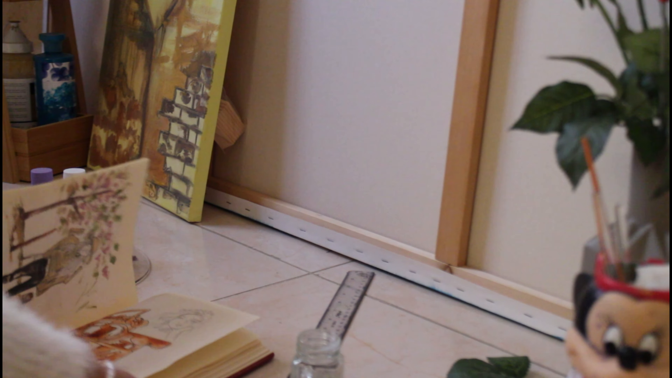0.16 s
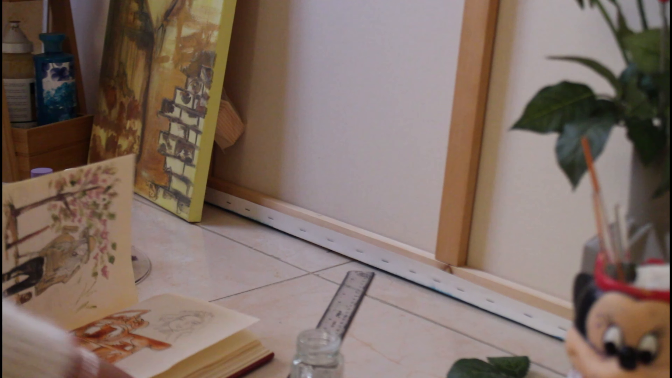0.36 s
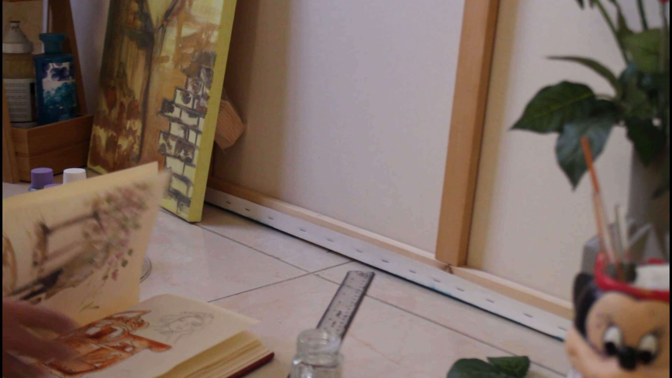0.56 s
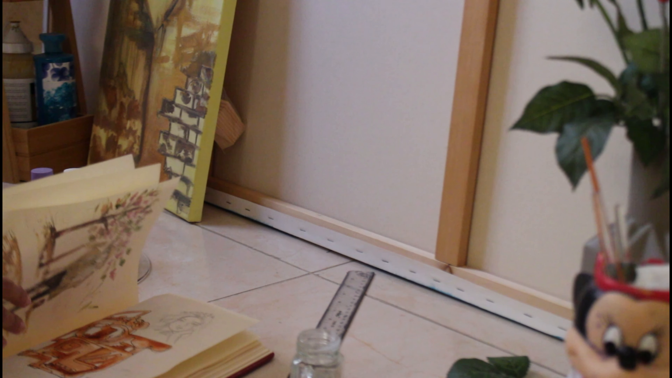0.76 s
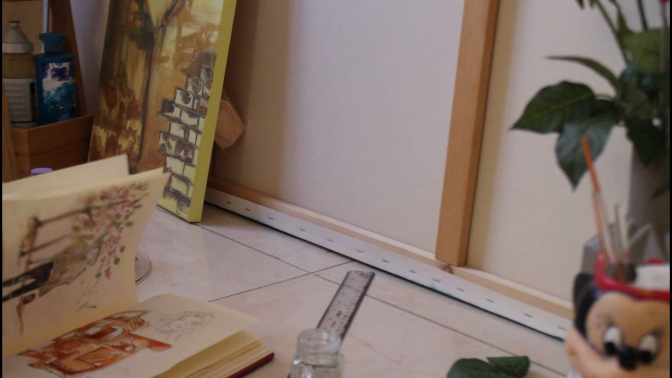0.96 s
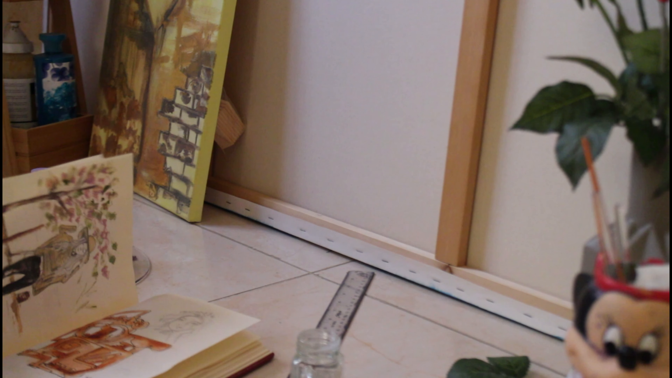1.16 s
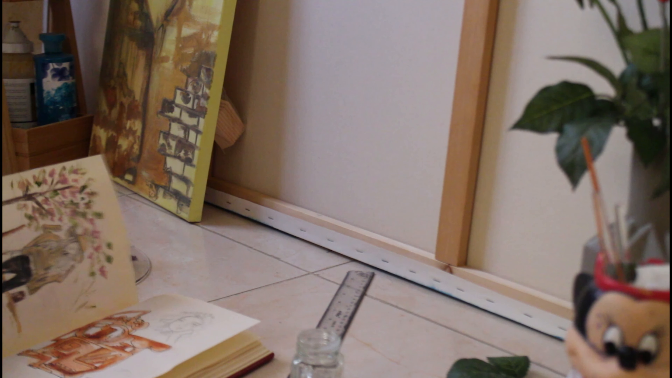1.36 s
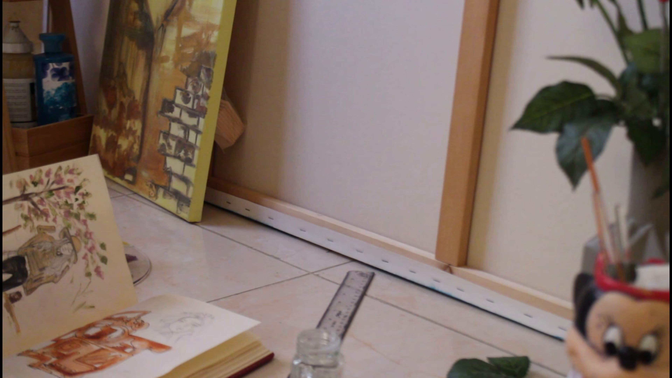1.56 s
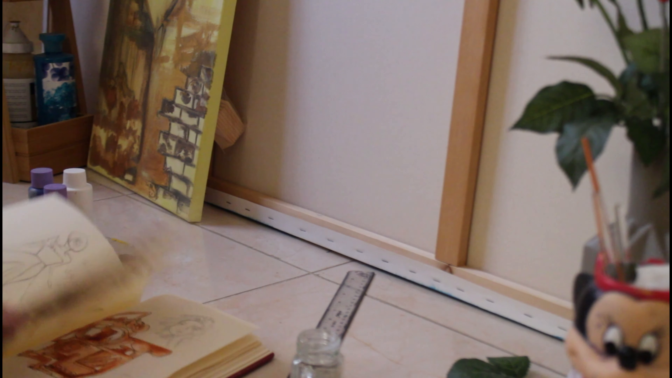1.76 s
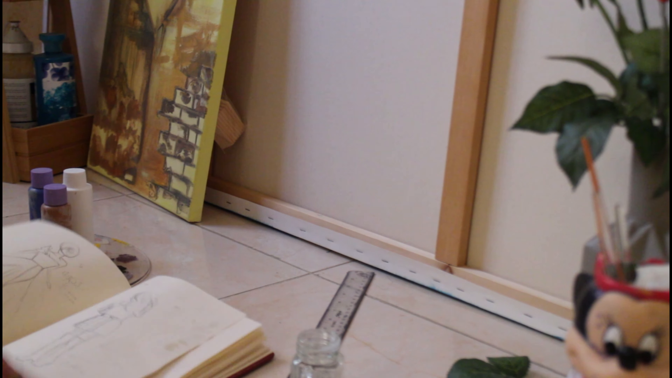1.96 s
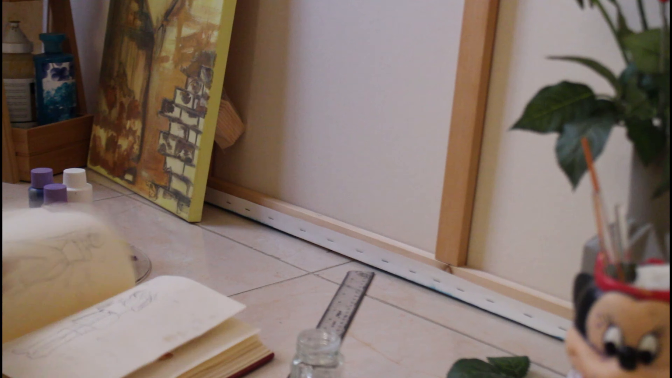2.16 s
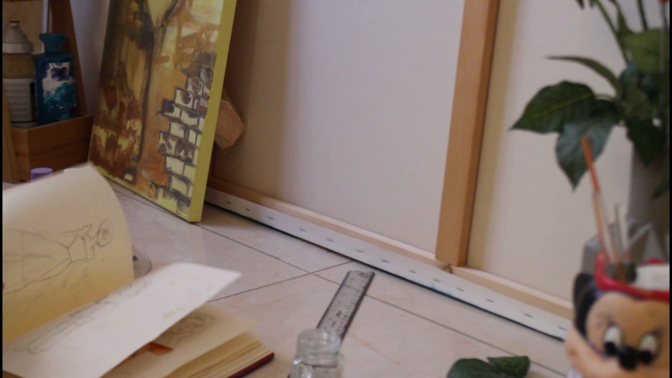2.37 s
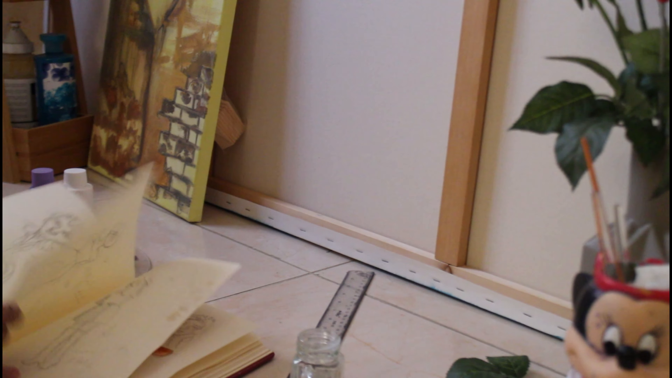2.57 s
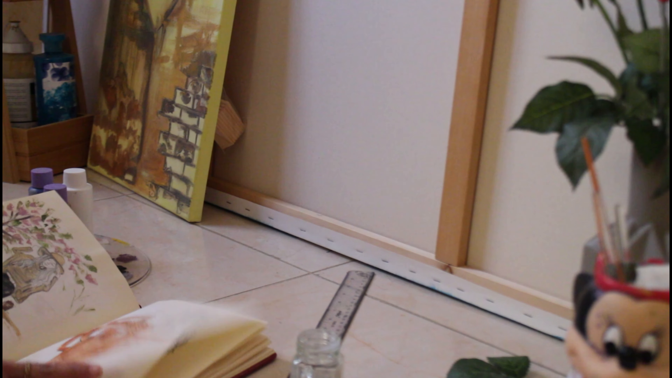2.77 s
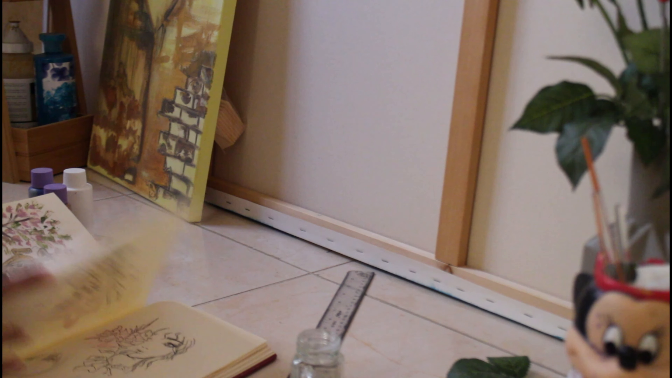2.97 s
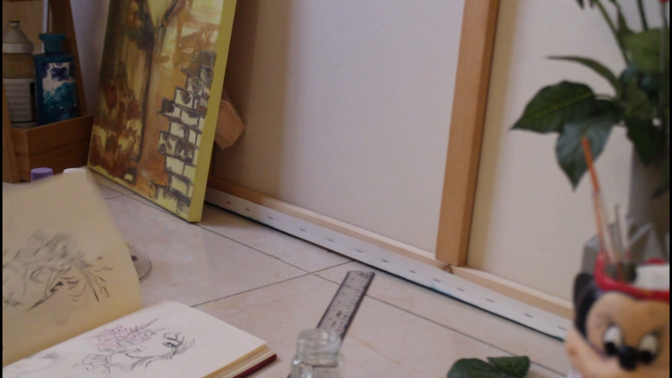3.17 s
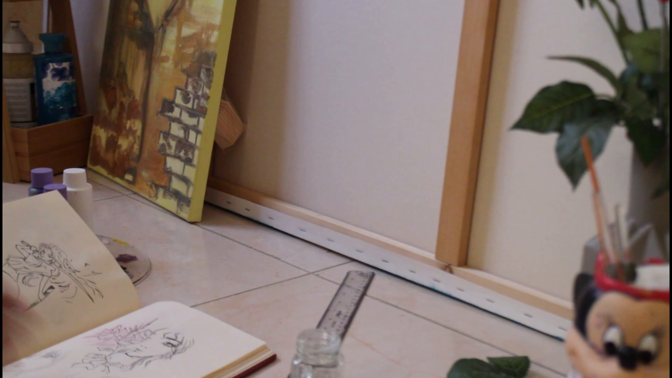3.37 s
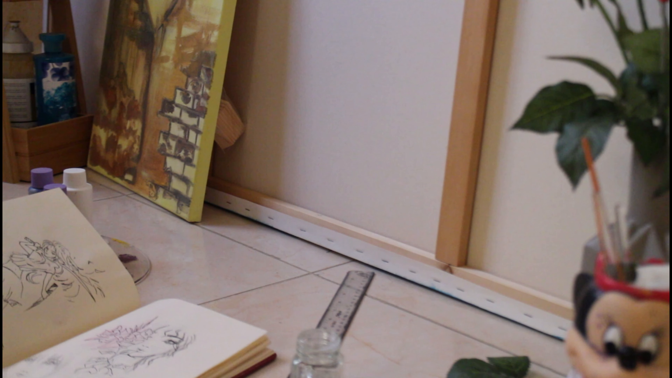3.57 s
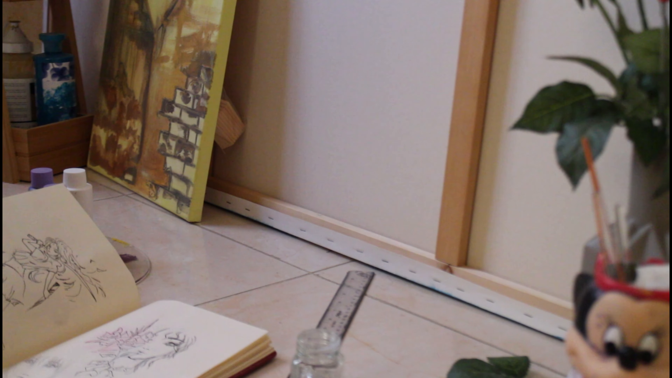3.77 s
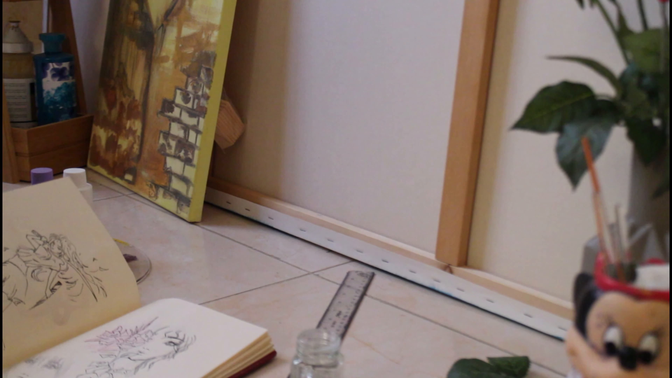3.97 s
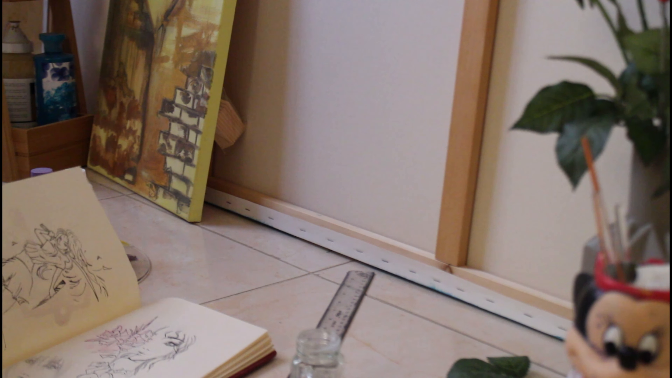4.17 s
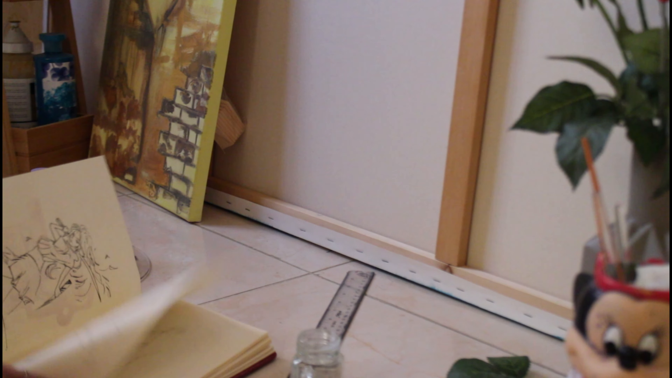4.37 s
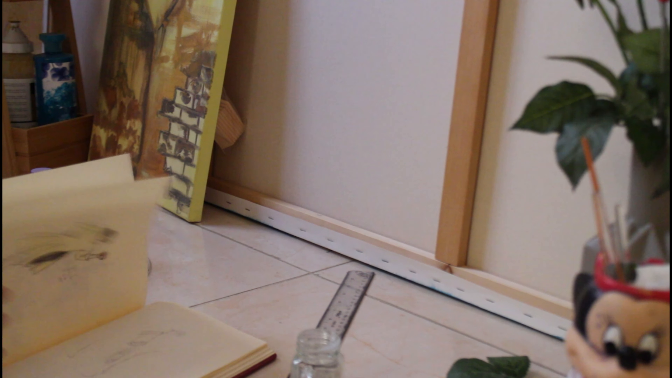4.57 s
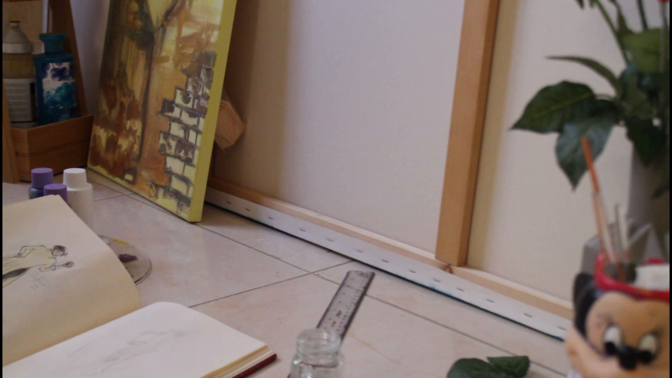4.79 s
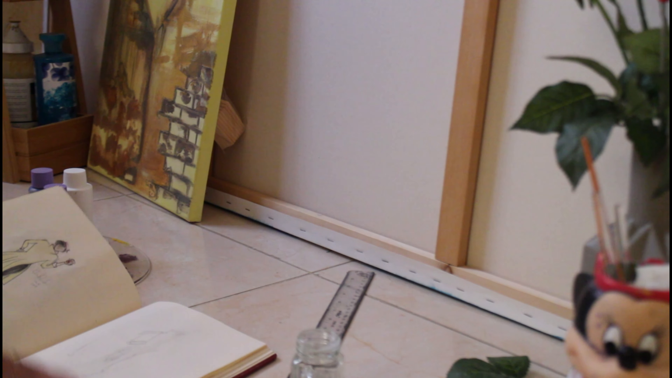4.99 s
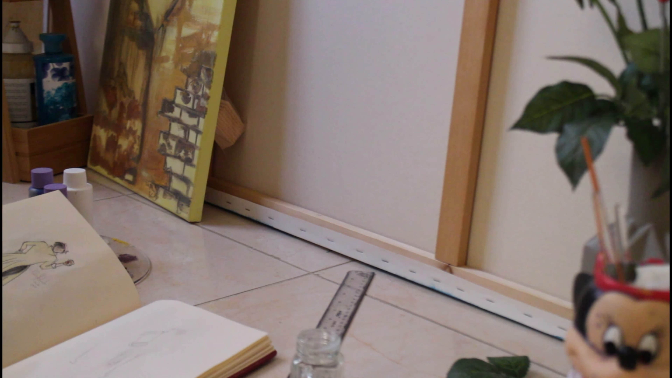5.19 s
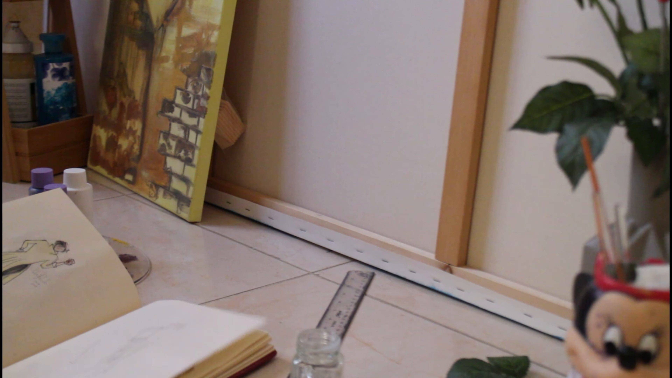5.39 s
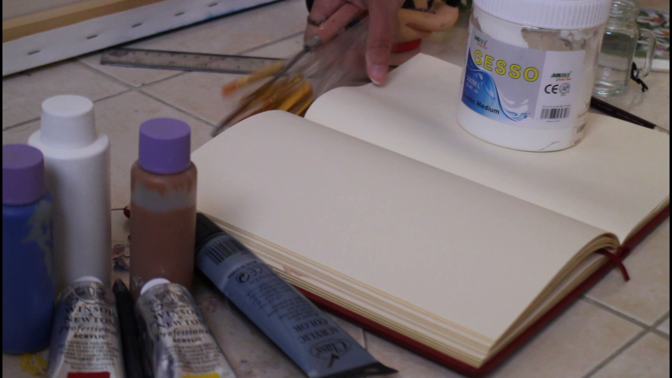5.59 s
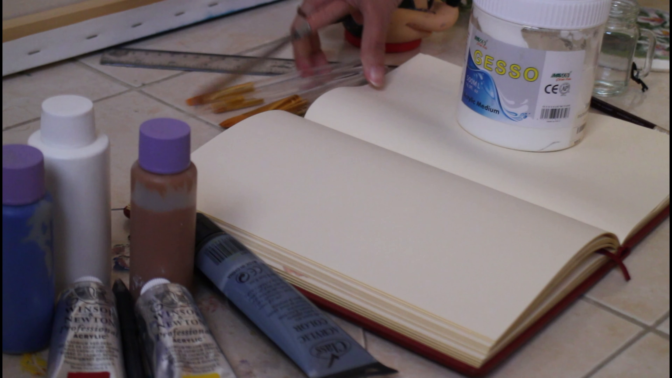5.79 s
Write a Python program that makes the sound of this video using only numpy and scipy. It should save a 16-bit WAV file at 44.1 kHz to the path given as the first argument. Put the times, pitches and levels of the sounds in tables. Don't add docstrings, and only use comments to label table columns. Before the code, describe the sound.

Indoors on a tiled floor, thick sketchbook pages slide and flick, quietly at first, then turn with sharp slaps around two and a half and four and a half seconds. After a lull, a bundle of wooden brushes rattles down at the end. A small camera microphone about a metre away adds hiss and faint motor ticks.

```python
import sys
import numpy as np
from scipy import signal
from scipy.fft import rfft, irfft
from scipy.io import wavfile
from scipy.ndimage import uniform_filter1d

SR = 44100
rng = np.random.default_rng(int(sys.argv[2]) if len(sys.argv) > 2 else 0)


def int16_out(signal):
    q = np.round(np.clip(np.atleast_2d(signal).T, -1, 1) * 32767)
    wavfile.write(sys.argv[1], SR, q.astype(np.int16))


def rack_gain(trim_db):
    fader = np.asarray(trim_db, float)
    return 10 ** (fader / 20)


N = 257544

SCENE_CHANGES = (2.65, 5.484)


def read(table, hz):
    f, v = np.transpose(table)[:2]
    return np.interp(np.log(hz + 1), np.log(f), v)


def shape(x, gain):
    n = x.shape[-1]
    return irfft(rfft(x) * gain(np.arange(n // 2 + 1) * SR / n), n)


def level(x, db):
    return x * rack_gain(db) / np.sqrt(np.mean(x ** 2))


def bell(f, hz, below, above):
    octaves = np.log2((f + 1) / hz)
    return rack_gain(-6 * (octaves / np.where(octaves < 0, below, above)) ** 2)


def walk(rate):
    k = int(SR / rate)
    held = np.repeat(rng.standard_normal(N // k + 1), k)
    return 1.48 * uniform_filter1d(held, k)[:N]


def slips(per_s, spread_db):
    happens = rng.random(N) < per_s / SR
    return happens * rng.standard_normal(N) * rack_gain(spread_db * np.minimum(rng.exponential(size=N), 3))


def ring(x, hz, t60):
    r, w = np.exp(-np.log(1000) / (t60 * SR)), 2 * np.pi * hz / SR
    return signal.lfilter([0, r * np.sin(w)], [1, -2 * r * np.cos(w), r * r], x)


def swells(s, peak_db, rise_s, fall_s, curve):
    block = 32
    t = np.arange(0, N, block) / SR
    s, peak_db, rise_s, fall_s = (np.reshape(v, (-1, 1)) for v in (s, peak_db, rise_s, fall_s))
    rising = (s - t) / np.maximum(rise_s, .01)
    falling = (t - s) / np.maximum(fall_s, .01)
    db = peak_db - 20 * np.maximum(rising, falling) ** curve
    same_scene = np.searchsorted(SCENE_CHANGES, t) == np.searchsorted(SCENE_CHANGES, s)
    power = rack_gain(2 * db) * same_scene + 1e-14
    return np.repeat(power, block, axis=1)[:, :N]


def snaps(s, peak_db, hz, thump_db, wall_db, length, below, above, thump_hz, rise):
    size, lead = 4096, 512
    out = np.zeros((2, N + size))
    t = np.arange(size) / SR - lead / SR
    fade = np.clip(1 + t / (rise * length), 0, 1) * np.exp(-np.log(1000) * np.maximum(t, 0) / length)
    events = np.broadcast(s, peak_db, hz, thump_db, wall_db)
    noises = rng.standard_normal((len(s), size))
    for (s, peak_db, hz, thump_db, wall_db), noise in zip(events, noises):
        puff = noise * fade
        both = np.array([puff, (t == 0) * np.linalg.norm(puff)])
        low_hz = thump_hz * rack_gain(np.clip(noise[0], -1, 2))
        crack = shape(both, lambda f: bell(f, hz, below, above))
        thump = shape(both, lambda f: bell(f, low_hz, 0.9, 1.0))
        snap = crack / np.abs(crack[0]).max() + rack_gain(thump_db) * thump / np.abs(thump[0]).max()
        i = int((s + rise * length / 2) * SR) - lead
        out[:, i:i + size] += rack_gain(peak_db - 0.5 + np.array([[0], [wall_db]])) * snap
    return out[:, :N]


def pages():
    # time in seconds, peak in dB, centre in Hz, relative thump in dB.
    flicks = [(0.16, -55.5, 1380, -1), (0.324, -64.5, 1100, -11), (0.563, -46.5, 1200, -11),
              (.594, -53.5, 1000, -20), (1.347, -55, 1560, -18), (3.204, -40.5, 1200, -22),
              (3.255, -45, 1500, -24), (3.278, -48, 1700, -20), (0.6971, -41, 1730, -25),
              (1.256, -59, 420, -17.5), (1.7696, -44.5, 1060, -22), (1.833, -45.5, 1460, -12),
              (1.8804, -33.5, 2200, -26), (2.223, -24, 1750, -21), (2.4736, -24.5, 2750, -37),
              (2.82, -46, 1500, -21), (2.995, -47, 1190, -9), (3.1175, -40.5, 1120, -1.5),
              (3.1728, -41, 1200, -19), (4.3618, -33.5, 2380, -20), (4.403, -46, 2040, -23),
              (5.4266, -49.5, 2700, -5.5)]
    # time in seconds, peak in dB, centre in Hz,
    # relative thump in dB.
    buckles = [(1.002, -48, 2050, -18), (1.0994, -48, 2470, -20), (1.1343, -41, 2240, -15.5),
               (1.4357, -50, 2070, -15), (1.67, -50.5, 1780, -10), (1.772, -51.5, 850, -23),
               (2.164, -43, 1370, -9), (2.8688, -40.5, 1310, -32), (2.8891, -37, 1400, -34),
               (3.0322, -41, 1390, -7.5), (3.1003, -39.5, 1130, -27.5), (3.142, -42.5, 1500, -30),
               (3.2224, -39.5, 1340, -34), (3.265, -55, 1410, -30), (4.4525, -40, 1090, -26)]
    # time in seconds, peak in dB, centre in Hz, relative thump in dB,
    # share to the walls in dB.
    slaps = [
        (1.396, -33.5, 2060, -25, -8),
        (2.219, -29, 3100, -26, -2),
        (2.4832, -25.5, 2100, -27.5, 0.5),
        (3.231, -46, 1500, -7, -9),
        (4.5745, -21, 2780, -23, -3.5),
    ]
    # time in seconds, peak in dB, centre in Hz.
    crackles = [(1.3953, -38.5, 3820), (1.8815, -61, 4760), (1.894, -44, 5200), (2.471, -31.5, 3900),
                (3.0234, -39.5, 4100), (3.034, -38, 4500), (3.0892, -36, 4500), (2.9906, -34.5, 1400),
                (0.6967, -42, 2970), (3.1, -35, 3180), (3.144, -39.5, 2300), (3.225, -44, 2800),
                (0.62, -53, 2500), (0.756, -51, 1610), (1.434, -41, 2120), (1.469, -47, 2100),
                (1.63, -51, 1500), (4.394, -45, 2800), (4.452, -50, 3000), (4.497, -51, 1500),
                (3.194, -40.5, 7100), (4.486, -47, 4100), (4.5625, -25.5, 3700)]
    out = snaps(*np.transpose(flicks), wall_db=-3.5,
                length=.016, below=0.95, above=0.96, thump_hz=515, rise=0.2397)
    out += snaps(*np.transpose(buckles), wall_db=-2.5,
                 length=.035, below=0.82, above=1.0, thump_hz=520, rise=.25)
    out += snaps(*np.transpose(slaps),
                 length=.054, below=1.43, above=0.6, thump_hz=370, rise=.11)
    out += snaps(*np.transpose(crackles), thump_db=-13.0, wall_db=-4.5,
                 length=.01, below=0.55, above=0.75, thump_hz=1000, rise=0.3)
    return out


def slide():
    # time of fastest motion in seconds, scrape in dB,
    # seconds to gain 20 dB, seconds to lose 20 dB, brightness in dB.
    drags = [(0, -74, .1, .5, 6), (.54, -66, 0.15, -0.1, -1), (0.629, -56, 0.1449, 0.11, -2.5),
             (.86, -60.5, 0.23, 0.1, -4), (1.015, -73, 0.12, 0.4, -2), (1.11, -65, 0.3, 0.13, -7.5),
             (1.139, -57.5, 0.03, 0.08, 9), (1.2, -70.5, 0.6, 0.5, -5), (1.397, -60, 0, 0.06, 14.5),
             (1.53, -60, 0.12, 0.1, -2.5), (1.65, -73, 1, 0.2, -10), (1.9, -69.5, 0.35, 0.5, 0.5),
             (2.034, -64, 0.13, 0.8, -9.5), (2.11, -62, -0.03, 0, -27), (2.196, -54, 0.08, 0.12, -0.5),
             (2.26, -53.5, 0.2, 0.06, -2), (2.443, -53, 0.05, 0.14, 4.5), (2.55, -65.5, 0.57, 0, -10),
             (2.818, -55.5, 0.06, 0.2055, 9), (2.89, -58, 0.08, 0.15, 12), (2.95, -61, 0.08, 0.04, 9),
             (3.035, -58, 0.04, 0.06, 7.5), (3.1, -61.5, 0, 0.13, 5), (3.17, -65.5, 0.05, 0.2, 4),
             (4.25, -60, 0.02, 0.16, 6), (4.3, -61, 0.06, 0.18, 6), (4.39, -58, 0.12, 0.1663, 12),
             (4.49, -61, 0.03, 0.15, 6), (4.62, -63, 0.06, 0.17, 2), (4.77, -67, 0, 0.05, 2),
             (5.13, -78.5, 0.04, -0.27, 15), (5.47, -61, 0.09, 2.2, 0), (5.649, -57, 0.06, -0.2, 11),
             (5.7, -42, 0.04, 0.05, -4), (5.79, -57, 0.17, .4, -7)]
    # time of deepest bend in seconds, boom in dB, seconds to gain 20 dB,
    # seconds to lose 20 dB.
    bends = [(0, -69.5, .1, 0.5), (.57, -74, 0.1, 0.5), (.86, -73, 7, 9), (1.12, -64, 0.5, 0.05),
             (1.39, -64, 0.4, 1), (1.62, -70, 1.5, 0.5), (1.97, -61, 0.2, 0.2), (2.172, -65, 2.5, 0.5),
             (2.25, -45, 0.1, 0.12), (2.5, -52, 0.1, 3), (2.83, -60.5, 0.02, 0.43), (2.885, -55, 0.04, 0.2),
             (3.0, -52, 0.06, 0.15), (3.045, -51, 0.09, 0.1), (3.12, -52, 0.13, 0.11),
             (3.175, -56, 0.13, 0.08), (3.24, -56, 0.14, 0.1), (3.6, -83, -20, 8), (4.37, -58.5, 0.13, 0.3),
             (4.46, -59.5, 0.12, 0.32), (4.6, -41, 0.0057, 0.11), (5.1, -75, 0.5, 0.2), (5.47, -62, 0, 1),
             (5.6, -70.5, 5, -8), (5.74, -55.5, 0.24, 5)]
    # time in seconds, level in dB.
    gusts = [
        (2.2, -69),
        (2.52, -76),
        (3.12, -67),
        (4.575, -73),
    ]
    # frequency in Hz, level in dB per Hz.
    scrape_colour = [(710, -86), (1200, -56), (1340, -9.5), (1950, -3), (4410, -2), (6800, -5), (8820, -8),
                     (14700, -25), (16000, -17)]
    # frequency in Hz, level in dB per Hz.
    boom_colour = [(88, -34), (150, -14.5), (213, -21), (351, -3.5), (500, -9.5), (1010, -3), (1420, -0.5),
                   (1710, -3.5), (5000, -19), (6500, -68), (11000, -120)]

    *motion, stroke_bright_db = np.transpose(drags)
    strokes = swells(*motion, curve=1.8)
    bright_db = stroke_bright_db @ strokes / strokes.sum(axis=0)
    edge = shape(slips(9000, 3.4), lambda f: rack_gain(read(scrape_colour, f)))
    edge /= np.std(shape(edge, lambda f: (f > 4500) & (f < 10000)))
    edge += (rack_gain(bright_db) - 1) * shape(edge, lambda f: np.clip(f / 5000 - 1.4, 0, 1))
    edge += (rack_gain(-.8 * bright_db) - 1) * shape(edge, lambda f: np.clip(2.2 - f / 1600, 0, 1))
    sheet = level(shape(slips(2500, 4.9), lambda f: rack_gain(read(boom_colour, f))), -4.0)
    air = level(shape(rng.standard_normal(N), lambda f: bell(f, 167, 0.88, 0.19)), -4.0)

    scrape = np.sqrt(strokes.sum(axis=0))
    bend = np.sqrt(swells(*np.transpose(bends), curve=1).sum(axis=0))
    gust = np.sqrt(swells(*np.transpose(gusts), rise_s=0.078, fall_s=0.22, curve=1).sum(axis=0))
    scraping = scrape * edge * rack_gain(1.4 * walk(40) - 2.5)
    booming = bend * sheet * rack_gain(2.1 * walk(25.03))
    return scraping + booming + gust * air


def trapped_air(table, width):
    out = np.zeros(N)
    noise = rng.standard_normal((2, N)) * rack_gain(3.0 * walk(120))
    for start, end, from_hz, to_hz, db in table:
        i, j = int(start * SR), int(end * SR)
        u = np.linspace(0, 1, j - i)
        pitch = from_hz * (to_hz / from_hz) ** u
        carrier = np.exp(2j * np.pi * np.cumsum(pitch) / SR)
        a, b = level(shape(noise[:, i:j], lambda f: rack_gain(-6 * (2 * f / (width * to_hz)) ** 2)), db)
        out[i:j] += np.real((a + 1j * b) * carrier) * np.sin(np.pi * u ** 0.72)
    return out


def pockets():
    # start in seconds, end in seconds, first pitch in Hz, last pitch in Hz, level in dB.
    tight_gaps = [(.63, 0.705, 1900, 2080, -64), (1.128, 1.19, 7700, 7600, -69),
                  (1.163, 1.25, 2800, 2580, -68), (1.34, 1.398, 2400, 2630, -69),
                  (1.4, 1.489, 2050, 2024, -55), (1.47, 1.565, 2800, 2960, -60.5),
                  (1.853, 1.9, 9000, 9000, -77), (1.88, 1.969, 2300, 1970, -58),
                  (2.418, 2.466, 4500, 4660, -69), (2.749, 2.843, 4200, 4800, -68),
                  (2.87, 2.93, 1350, 1345, -52), (3.08, 3.133, 3100, 2860, -55.5),
                  (4.222, 4.357, 4800, 4530, -68.5), (5.4, 5.498, 6000, 6060, -69.5)]
    return trapped_air(tight_gaps, width=0.13) * rack_gain(np.array([[0], [-12]]))


def hollows():
    # start in seconds, end in seconds, first pitch in Hz, last pitch in Hz, level in dB.
    arches = [(0.465, 0.6, 4490, 3980, -67), (0.56, 0.69, 2604, 2496, -61), (0.715, 0.78, 1800, 1504, -62),
              (0.761, .95, 1800, 1610, -72), (1.377, 1.413, 1990, 2200, -57), (1.42, 1.6, 2200, 2400, -65),
              (1.672, 1.74, 1900, 1900, -70), (1.768, 1.8, 1890, 1920, -72),
              (2.23, 2.32, 1700, 1402, -51.5), (2.495, 2.57, 2300, 1900, -44),
              (2.575, 2.645, 1600, 1510, -51), (2.89, 2.97, 2000, 1614, -59), (3.02, 3.08, 1198, 1100, -56),
              (3.195, 3.29, 1300, 1404, -54), (3.219, 3.286, 2800, 2500, -57.5),
              (4.369, 4.43, 2400, 1614, -63), (4.452, 4.55, 1100, 1220, -63), (4.585, 4.7, 2400, 2004, -47),
              (4.69, 4.8, 2000, 1800, -58.5)]
    return trapped_air(arches, width=0.7) * rack_gain(np.array([[-1.0], [-7.0]]))


def brushes():
    # time in seconds, peak in dB, centre in Hz,
    # share to the walls in dB, relative ring in dB.
    lifts = [(5.554, -56, 4700, -3, -35), (5.6126, -30.5, 6300, -16, -33.5), (5.627, -48, 7600, -10, -25),
             (5.6362, -31, 6600, -4, -23), (5.6444, -27.5, 5800, 1, -15), (5.638, -37, 4250, -9, -6.5),
             (5.647, -33, 4370, -12, -15), (5.655, -36.5, 4270, 5, -7), (5.664, -20, 11100, -10, -22)]
    # time in seconds, peak in dB, centre in Hz,
    # relative thump in dB, relative ring in dB.
    landing = [(5.6761, -21.5, 4920, -15, -32), (5.6777, -19, 9100, -25, -4.5),
               (5.6797, -18.5, 3480, -11.5, -26), (5.682, -23.5, 7300, -9.5, -11),
               (5.689, -31, 3630, -18, -32), (5.6975, -17, 9400, -19, -13), (5.7005, -26, 4520, -13.5, -21),
               (5.708, -21.5, 9100, -14, -16), (5.7107, -22, 8600, -10.5, -14),
               (5.7185, -21, 8050, -20, -13), (5.722, -20.5, 8200, -20.5, -12),
               (5.7259, -27.5, 2290, -16, -14), (5.73, -26.5, 2120, -10.5, -13.5),
               (5.7438, -21.5, 5780, -20, -15.5), (5.7441, -27, 7800, -22, -6),
               (5.757, -33.5, 5920, -6.5, -4), (5.766, -34, 5770, -20, -11), (5.777, -29, 5860, -25, -15),
               (5.7874, -36, 5930, -27, -9), (5.804, -35, 5370, -18, -14)]
    *lifted, wall_db, _ = np.transpose(lifts)
    knocks = snaps(*lifted, thump_db=-40, wall_db=wall_db,
                   length=.013, below=0.65, above=1.0, thump_hz=760, rise=.08)
    knocks += snaps(*np.transpose(landing)[:-1], wall_db=-6.5,
                    length=.012, below=0.79, above=0.59, thump_hz=785, rise=.08)
    for s, peak_db, hz, *_, ring_db in lifts + landing:
        blow = np.arange(N) == int(s * SR)
        t60 = 0.073 * min(5800 / hz, 1) ** 3
        knocks += rack_gain(peak_db + ring_db) * ring(blow, hz, t60) * rack_gain(np.array([[0], [-10]]))
    return knocks


def room():
    # frequency in Hz, t60 in seconds.
    decay = [(200, 0.49), (600, 0.43), (1500, 0.47), (3700, 0.42), (9000, 0.33)]
    # frequency in Hz, level in dB.
    wall_tone = [(300, -1.5), (800, 1), (1500, 0), (2200, -1), (3500, -1.5), (8000, -1)]
    # frequency in Hz, side minus mid in dB.
    wall_side = [(60, -10), (110, -18), (200, -26), (380, -18), (700, -18), (1290, -11.5), (2380, -10),
                 (4400, -8), (8120, -11), (15000, 21)]
    t = np.arange(SR) / SR
    dense = np.clip(t / .05, .05, 1)
    echoes = rng.standard_normal((2, SR)) * (rng.random(SR) < dense) / np.sqrt(dense)
    echoes *= np.clip((t - .003) / 0.00085, 0, 1)
    trail = np.zeros((2, SR))
    for hz in 45 * 2. ** np.arange(0, 9, .5):
        band = shape(echoes, lambda f: np.clip(1 - 2 * np.abs(np.log2((f + 1) / hz)), 0, 1))
        trail += band * rack_gain(-60 * t / read(decay, hz))
    ripple = uniform_filter1d(np.abs(rfft(trail[0])) ** 2, size=150)
    trail = shape(trail, lambda f: rack_gain(read(wall_tone, f)) * np.sqrt(read(decay, f) / ripple))
    mid, side = trail / np.sqrt(np.sum(trail[0] ** 2))
    side = shape(side, lambda f: rack_gain(np.minimum(read(wall_side, f), 7)))
    return np.array([mid + side, mid - side])


def bump():
    # time in seconds, peak in dB, pitch in Hz, t60 in seconds.
    s, peak_db, hz, t60 = (5.715, -72, 45, 4)
    return rack_gain(peak_db) * ring(np.arange(N) == int(s * SR), hz, t60)


def lens_motor():
    # time in seconds, peak in dB, relative upper ring in dB.
    ticks = [(0.119, -58.5, 0.5), (0.327, -58.5, -5), (0.495, -64, 9), (0.704, -63, 9.5), (0.87, -58.5, -6),
             (0.997, -62, 2), (1.079, -57.5, -15), (1.248, -58, -15), (1.487, -56, -4), (1.675, -56, -13),
             (1.775, -59.5, 5), (1.996, -57, -6), (2.372, -57.5, -13), (2.761, -62, -11.5),
             (3.347, -64.5, -29), (3.425, -60.5, -7), (3.592, -66, -15), (3.705, -66.5, 6.5),
             (3.8, -61, -18), (3.918, -64.5, 5.5), (3.969, -62.5, 6), (4.096, -63, -11), (4.179, -64, 9),
             (4.259, -61, -17), (4.926, -72.5, 14), (5.011, -75, -18), (5.095, -63, 1), (5.137, -62, 4),
             (5.39, -58, -18), (5.604, -61.5, 0)]
    # pitch in Hz, t60 in seconds.
    modes = [
        (450, 0.062),
        (590, 0.059),
        (680, 0.099),
    ]
    s, peak_db, upper_db = np.transpose(ticks)
    low, high = np.zeros((2, N))
    low[(s * SR).astype(int)] = rack_gain(peak_db + 3.0)
    high[(s * SR).astype(int)] = rack_gain(peak_db + upper_db)
    low += slips(32, 0.83) * rack_gain(-67)
    high += slips(25, 0.99) * rack_gain(-70.5)
    body = ring(low, *modes[0]) + ring(high, *modes[1]) + 0.14 * ring(high, *modes[2])
    body = np.roll(uniform_filter1d(body, size=20), SR // 400)
    return 0.88 * shape(body, lambda f: bell(f, 572, 0.43, 0.75)) * np.array([[1.1], [.9]])


def hiss():
    # frequency in Hz, level in dB per Hz.
    mid_colour = [(18, -16), (30, -2), (184, -9), (540, -3), (962, -6), (1910, -11), (2750, -14),
                  (3980, -14), (4300, -15), (5900, -17.5), (10200, -22), (14800, -18), (16000, -23)]
    # frequency in Hz, level in dB per Hz.
    side_colour = [(18, -26), (30, -22), (70, -15.5), (526, -0.5), (702, -3), (1350, -2), (2010, -5.5),
                   (2540, -8), (3770, -11.5), (11100, -23.5), (14000, -16.5), (16000, -30)]
    # frequency in Hz, rms level in dB.
    hum = [
        (118.4, -90),
        (172.3, -93.5),
    ]
    mid = level(shape(rng.standard_normal(N), lambda f: rack_gain(read(mid_colour, f))), -71.5)
    side = level(shape(rng.standard_normal(N), lambda f: rack_gain(read(side_colour, f))), -68)
    waver_db = 2 * walk(6)
    for hz, db in hum:
        mid = mid + rack_gain(db + waver_db) * np.sin(2 * np.pi * hz * np.arange(N) / SR)
    return np.array([mid + side, mid - side])


def scene():
    # frequency in Hz, level in dB.
    air_path = [(6000, -0.5), (10300, -2), (11500, -9), (16000, -10)]
    # frequency in Hz, left minus right in dB.
    balance = [(60, 0.5), (110, 2), (200, -0.5), (380, 0.5), (700, 0), (1290, -1.5), (2380, -1.5),
               (4400, -2), (8120, -3.5), (15000, -1.5)]
    sources = pages() + brushes() + slide() * rack_gain(np.array([[-1.5], [-4.0]]))
    trail = room() * rack_gain(2.5)
    direct, send = sources + pockets() + hollows()
    out = np.array([direct, direct])
    edges = [0, *(int(s * SR) for s in SCENE_CHANGES), N]
    for a, b in zip(edges, edges[1:]):
        out[:, a:b] += signal.fftconvolve(send[None, a:b], trail, axes=1)[:, :b - a]
    halves = np.array([[.5], [-.5]])
    out = shape(out, lambda f: rack_gain(read(air_path, f) + read(balance, f) * halves))
    return out + bump() + lens_motor() + hiss()


def roll_off(x):
    return signal.sosfilt(signal.butter(12, 16350, fs=SR, output="sos"), x)


def record(dry):
    # centre in Hz, width in Hz, depth in dB.
    hz, width, db = (11250, 170, -9)
    # frequency in Hz, level in dB.
    capsule = [(28, -5), (50, -23), (62, 0), (16000, 0)]
    top_hz = 15750

    def microphone(f):
        notch_db = db * np.exp(-((f - hz) / width) ** 2)
        return rack_gain(read(capsule, f) + notch_db) * (f < top_hz)

    return roll_off(shape(dry, microphone))


dry = scene()
out = record(dry)
int16_out(out)
```